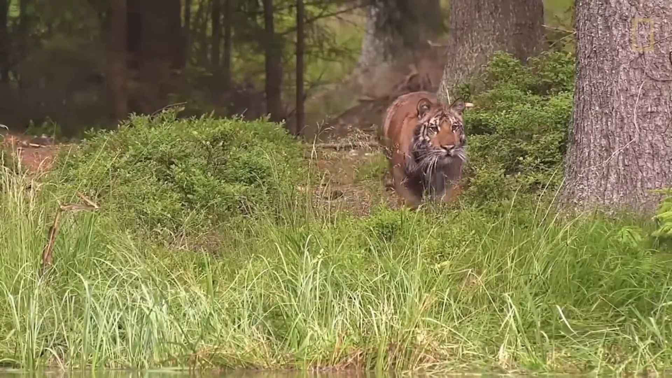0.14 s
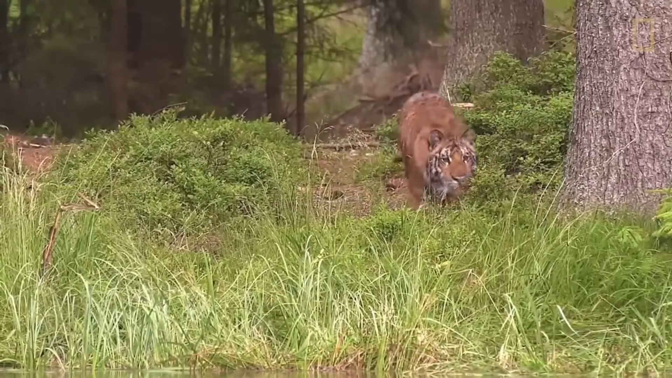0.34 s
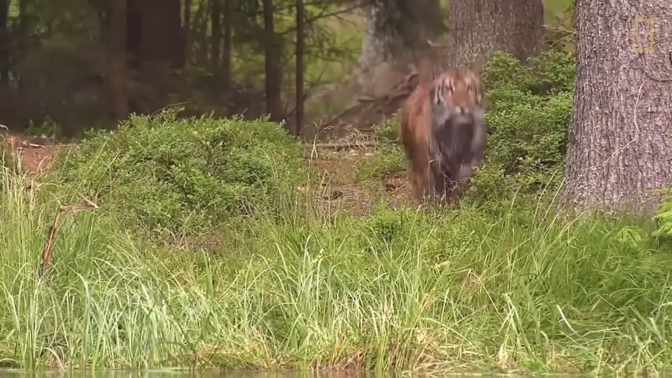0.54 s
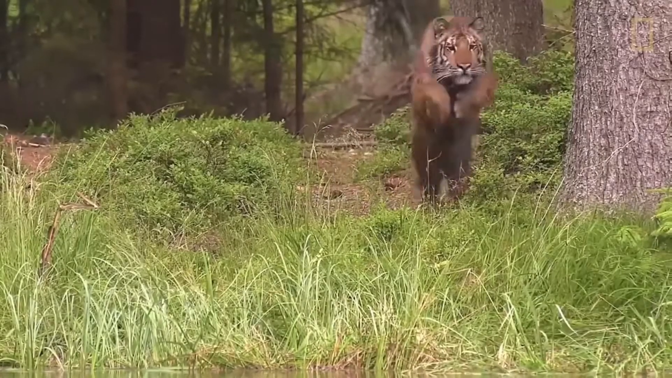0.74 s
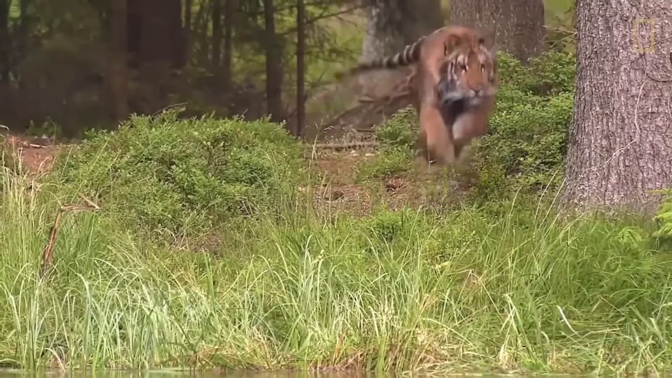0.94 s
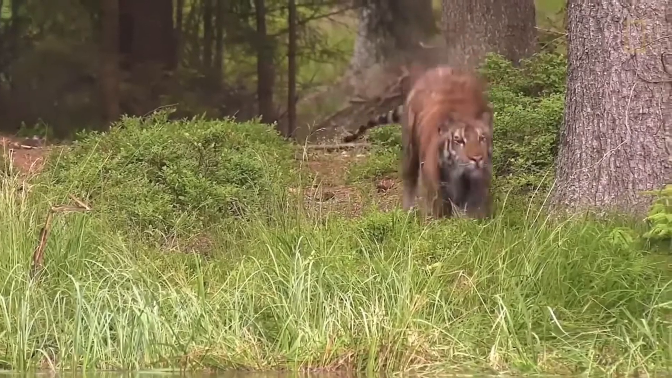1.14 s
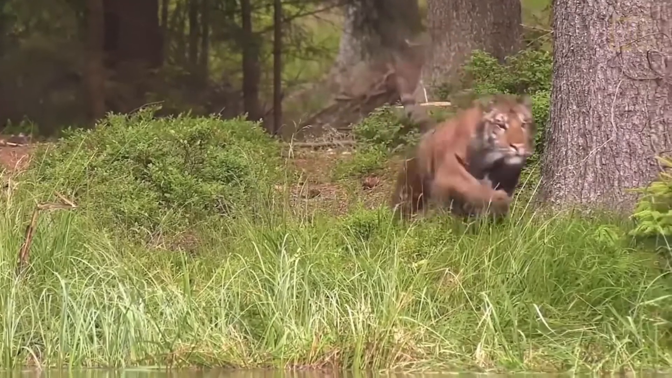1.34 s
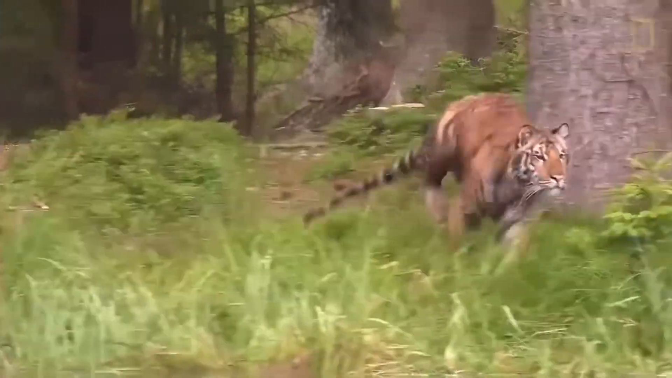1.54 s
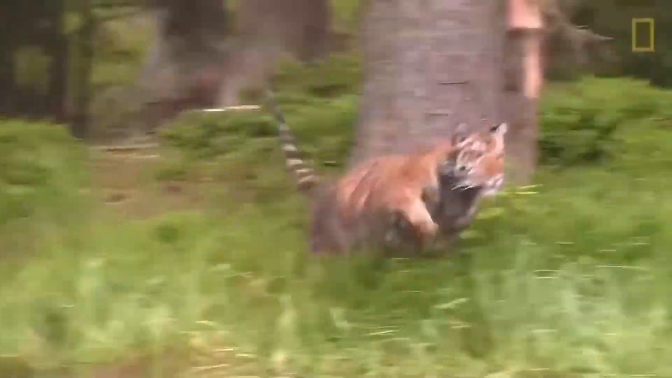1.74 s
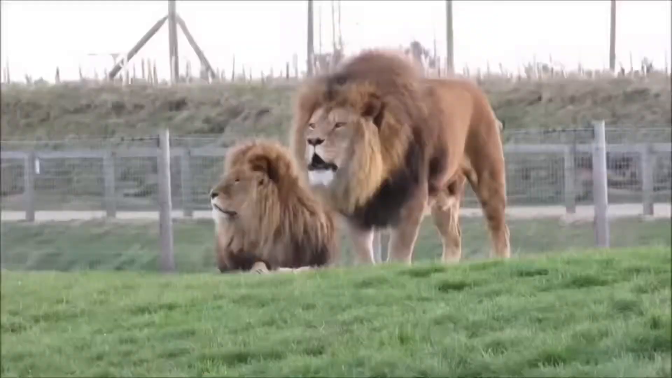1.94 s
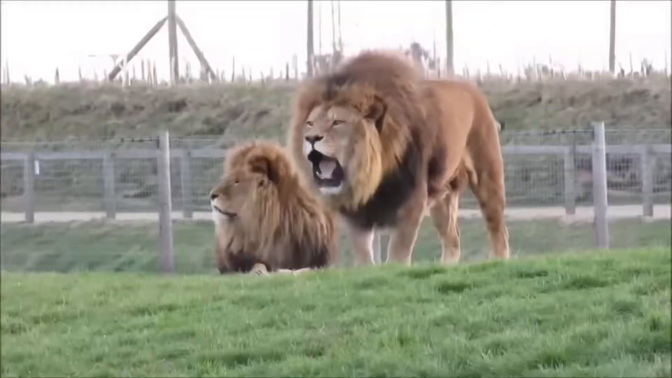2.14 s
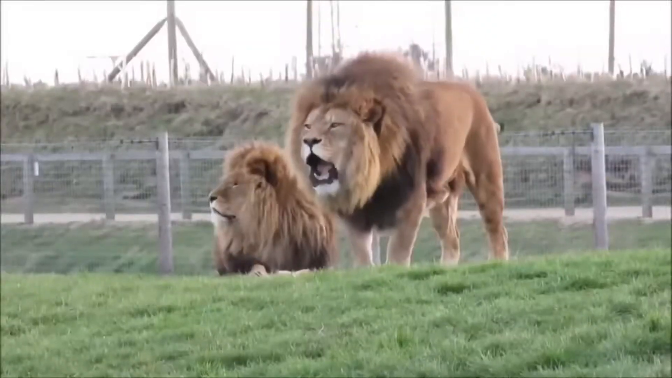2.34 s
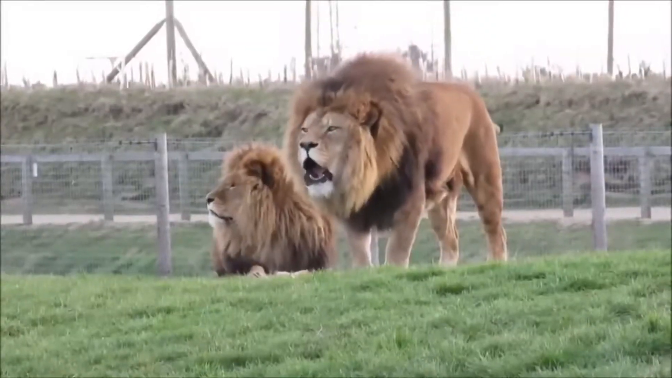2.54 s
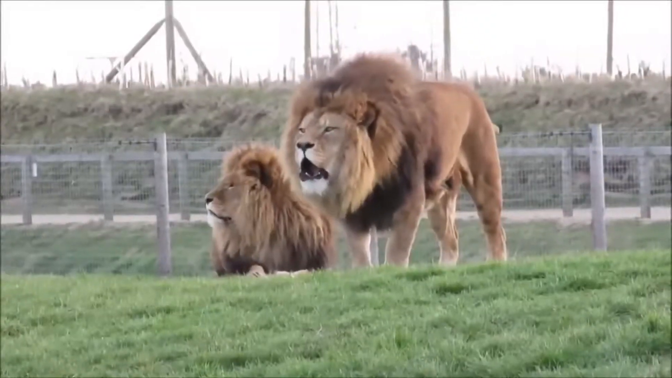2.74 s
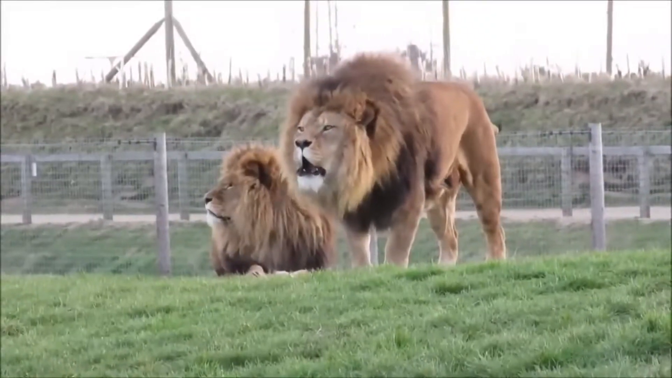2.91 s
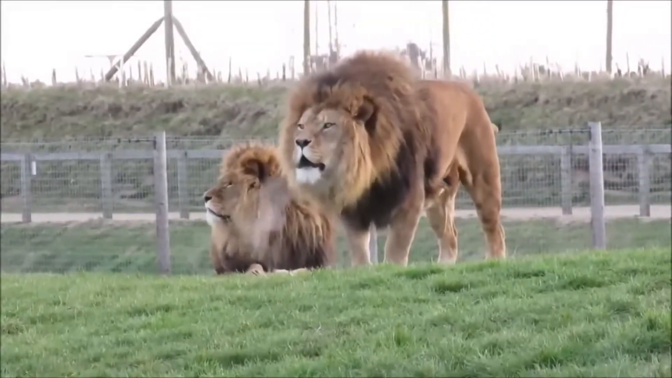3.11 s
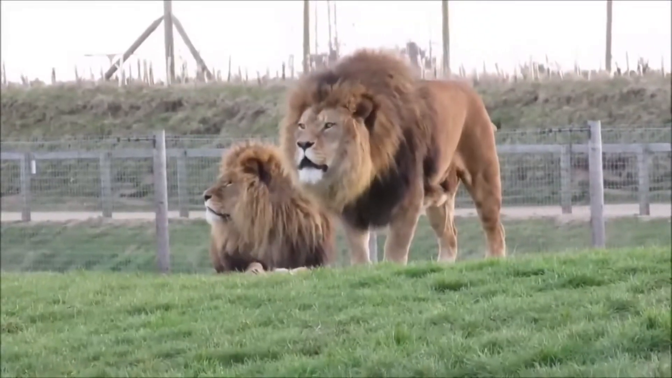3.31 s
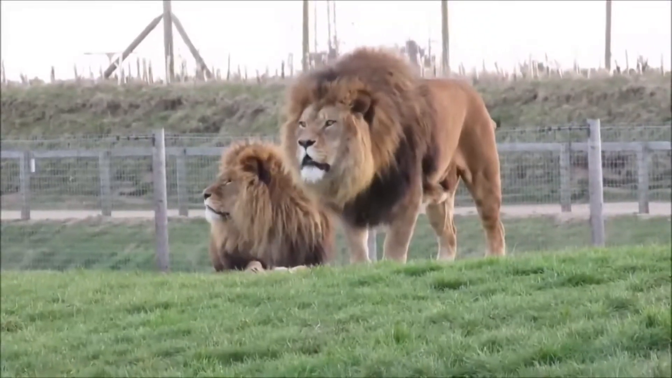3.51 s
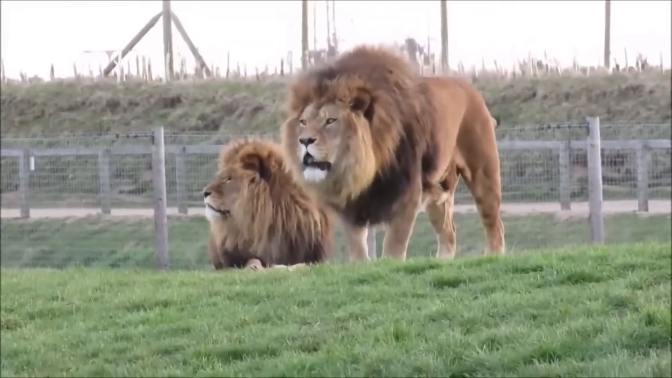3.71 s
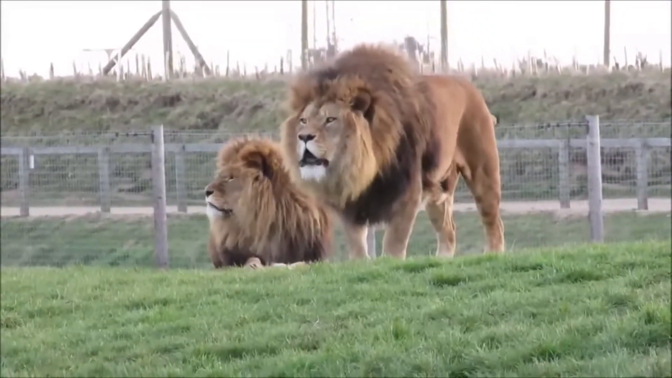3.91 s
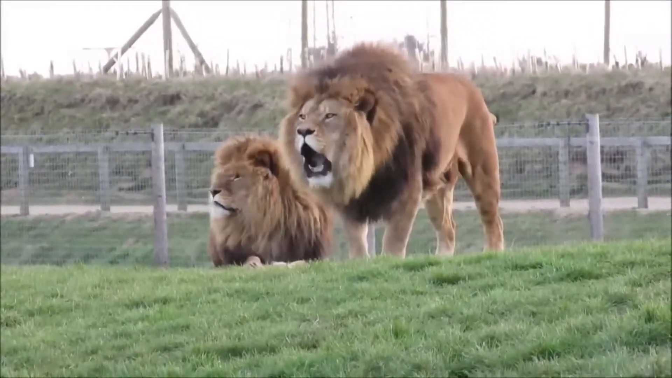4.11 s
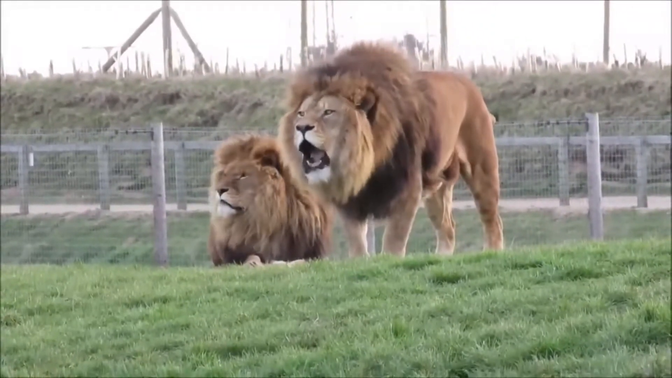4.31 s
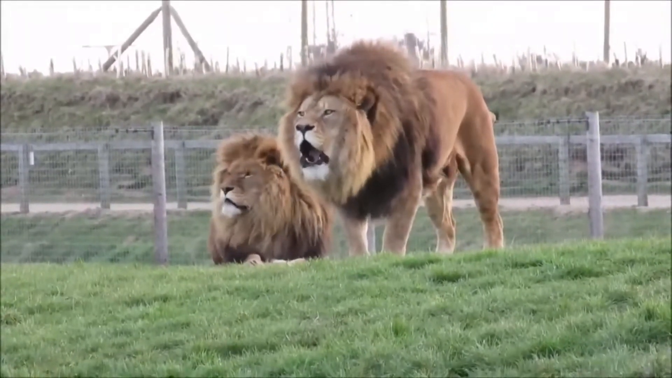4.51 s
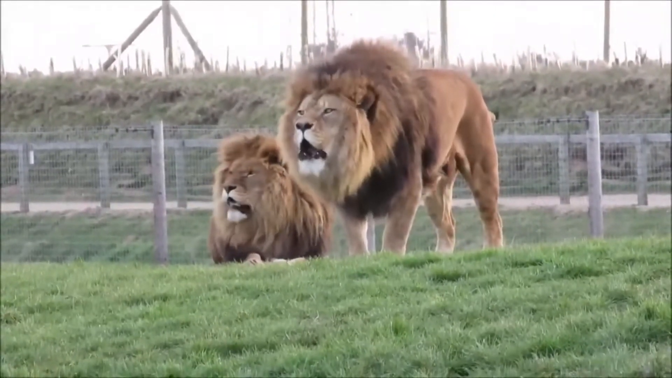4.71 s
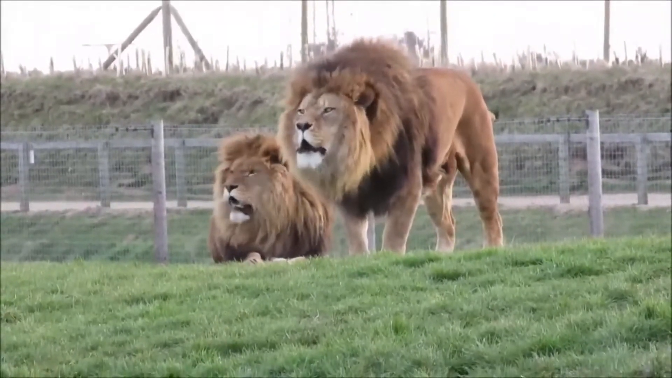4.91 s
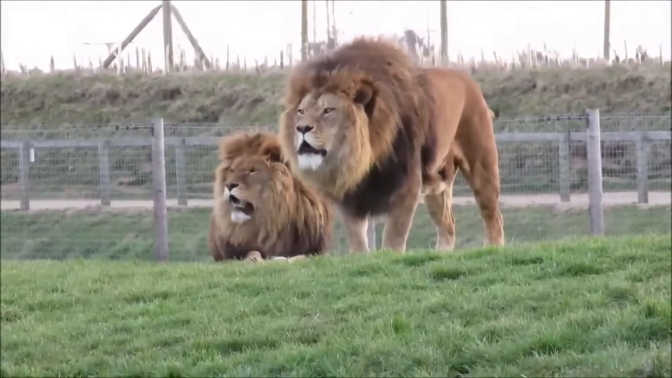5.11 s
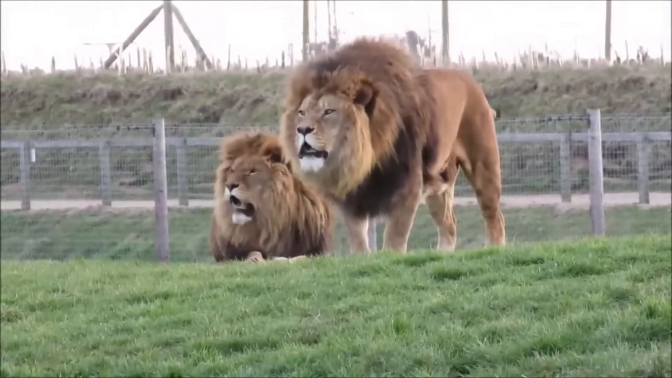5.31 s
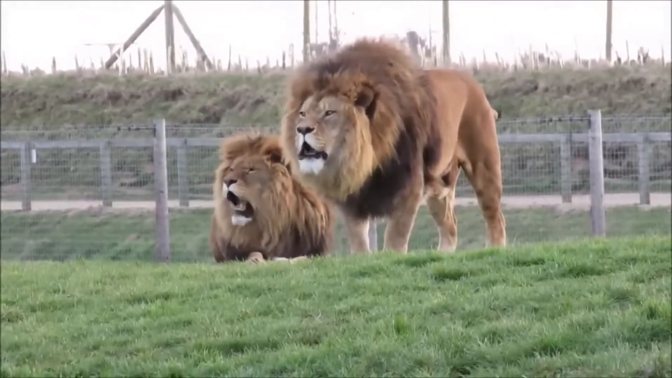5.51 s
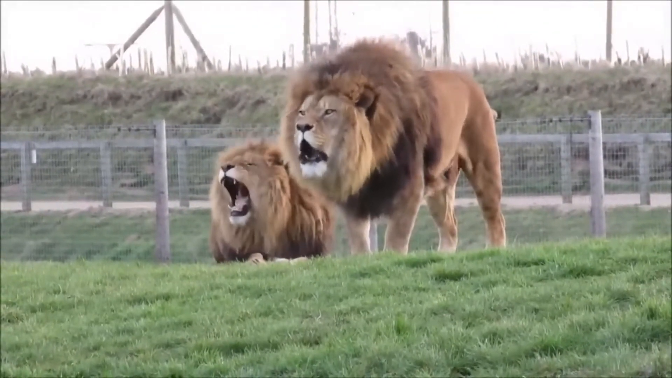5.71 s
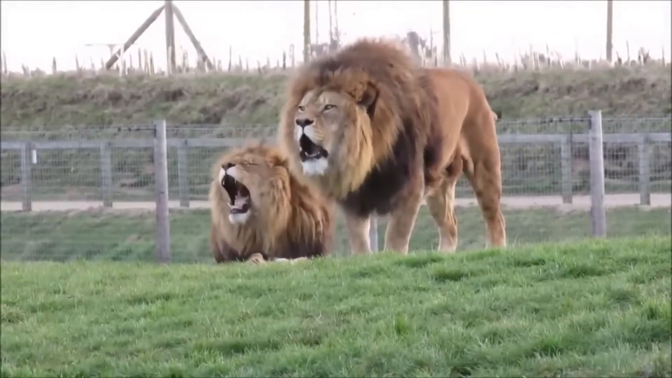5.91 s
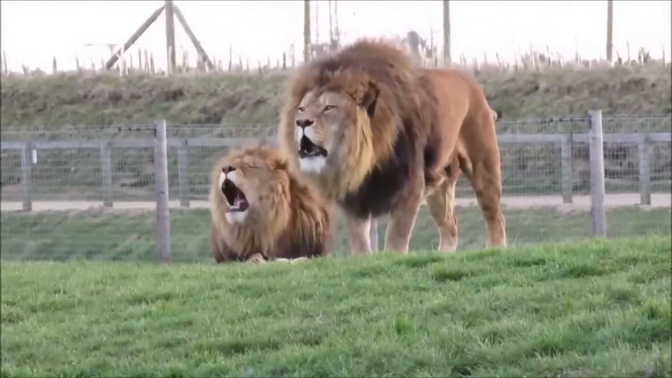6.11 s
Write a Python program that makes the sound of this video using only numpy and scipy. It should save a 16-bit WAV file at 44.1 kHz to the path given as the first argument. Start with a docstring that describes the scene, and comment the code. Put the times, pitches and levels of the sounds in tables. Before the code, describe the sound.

A lion roars four times in an open grassy enclosure. Each roar swells from a moan into a rough, chesty bellow and sinks to a grunt. A long, higher, hoarse groan follows the second roar, and the fourth is cut off as it starts. A far bird whistles faintly after the first, over a soft outdoor hush. Wind builds in the second half, rumbling and thumping on the microphone.

```python
"""A lion's moan swells, breaks up, settles into a chesty bellow and sinks to a grunt: one roar.
It roars four times in a grassy enclosure, with a long hoarse groan after the second; the last is cut off.
Its breath flaps the vocal folds in its throat; the throat booms and the open mouth rasps and hisses.
A freshening breeze buffets each side of the microphone; a far bird whistles over a soft outdoor hush."""
import sys
import numpy as np
from scipy import signal
from scipy.fft import rfft, irfft, next_fast_len
from scipy.io import wavfile
from scipy.ndimage import uniform_filter1d

SR = 44100
rng = np.random.default_rng(int(sys.argv[2]) if len(sys.argv) > 2 else 0)


def dump(signal):
    """Clip the signal to [-1, 1] and save it as 16-bit WAV at the path in sys.argv[1]."""
    limited = np.clip(np.atleast_2d(signal).T, -1, 1)
    pcm = np.round(limited * 32767).astype(np.int16)
    wavfile.write(sys.argv[1], SR, pcm)


N = 271215
TIME = np.arange(N) / SR

# The stages of a roar, from first moan to silence. A resonance is a pitch that a hollow space boosts.
# (uneven pulsing [0-1], low throat resonance [Hz], mouth resonance [Hz], upper throat [dB], nose [Hz])
ROAR_STAGES = [(0, 370, 860, 14, 3800), (0, 340, 1600, -0.5, 2700), (0.03, 315, 1400, -7, 2300),
               (0.38, 306, 1500, -4, 5700), (0.64, 255, 1480, 7.5, 3400), (0.34, 430, 1700, 10, 3150),
               (0.08, 400, 1170, -4, 3400), (0.3, 380, 1100, -4, 3700), (0.98, 250, 1200, -10.5, 3600),
               (1, 670, 2700, 1.5, 4900)]
# One list a roar, one row a stage: (time [s], pitch [Hz], roughness [0-1], mouth brightness [dB])
ROAR_COURSES = [
    [(0, 129.5, 0.11, 12), (.09, 150.5, 0.17, -5.5), (.31, 140.6, 0.31, -11), (.41, 169.7, 1.03, -10),
     (.54, 182.7, 0.5, -5.5), (.71, 195.2, 0.18, 1), (.81, 200.2, 0.58, 9.5), (.885, 152.8, 0.45, 10),
     (.95, 132.2, 0.43, 5.5), (1.1, 116.3, 1, -4)],
    [(2.21, 137, 0.74, -20), (2.31, 145.5, 0, 2.5), (2.41, 164.1, 0.83, 5.5), (2.56, 166.3, 0.51, -3.5),
     (2.73, 179.1, 0.84, -3.5), (2.88, 198.3, 0.22, -11.5), (3.07, 201.4, 0.59, -0.5),
     (3.17, 152.7, 0.52, -3.5), (3.27, 138.6, 0.63, -16), (3.38, 127, 0.83, 4)],
    [(4.28, 135, 0.45, 2), (4.325, 142.9, 0.12, 8.5), (4.375, 152, 0.63, -0.5), (4.45, 173.1, 0.6, 3),
     (4.6, 178.7, 0.36, 18), (4.79, 195.2, 0.4, -5), (4.95, 191.8, 0.67, -8.5), (5.055, 150.6, 0.52, 4),
     (5.1, 142.7, 0.53, -5.5), (5.22, 138.6, 0.16, -4)],
    [(5.92, 166, 0.4, -12), (5.96, 172.5, 0.53, 3), (5.99, 178, 0.53, -7), (6.02, 178.9, 0.65, 1),
     (6.2, 179.6, 0.4, 7)],
]
# Loudness, one list a roar: (time [s], chest [dB], throat [dB], rasp [dB], hiss [dB])
ROAR_LEVELS = [
    [(0.0, -44, -41, -55, -66.5), (0.014, -46.5, -35, -56, -63), (0.082, -53, -24, -41, -64),
     (0.128, -40.5, -23, -53.5, -68.5), (0.18, -49, -25.5, -50.5, -60), (0.306, -44.5, -18.5, -44, -62),
     (0.584, -31.5, -23, -42.5, -55.5), (0.682, -18, -27, -40, -50), (0.734, -19, -33.5, -45.5, -53),
     (0.748, -32, -30.5, -42.5, -54), (0.8, -13.5, -20, -39, -51), (0.82, -27.5, -26, -42, -50),
     (0.888, -21.5, -26, -38.5, -53), (0.926, -29, -37, -49, -52.5), (0.992, -42, -41.5, -52, -67),
     (1.06, -44.5, -61, -78, -81)],
    [(2.21, -51.5, -49, -69, -84.5), (2.242, -49.5, -39.5, -62.5, -81.5), (2.29, -47, -28.5, -46.5, -62.5),
     (2.394, -42.5, -20, -41.5, -66.5), (2.622, -45, -21, -45, -63.5), (2.764, -34.5, -25.5, -42, -53),
     (2.834, -23.5, -25, -44.5, -54), (2.85, -18.5, -30, -42, -46.5), (2.91, -16.5, -32.5, -43, -51.5),
     (2.946, -27.5, -31, -45.5, -52.5), (3.008, -21, -25.5, -39.5, -54.5), (3.108, -29, -24, -43, -54),
     (3.136, -23.5, -25.5, -40, -52), (3.16, -21, -26.5, -34.5, -56), (3.198, -20, -28.5, -43, -54.5),
     (3.3, -38.5, -39.5, -46, -63), (3.37, -50.5, -45, -54, -78)],
    [(4.29, -36, -52, -45, -77.5), (4.306, -34.5, -31.5, -52.5, -73), (4.362, -47, -23, -43, -63.5),
     (4.616, -36, -22, -38, -54.5), (4.768, -20.5, -30.5, -45, -53), (4.812, -17, -32, -40, -56),
     (4.882, -24, -26.5, -42.5, -53.5), (4.936, -23.5, -22, -37, -50), (4.964, -31, -22.5, -47, -49),
     (4.982, -25, -28, -35.5, -47), (5.022, -22.5, -24.5, -40, -48.5), (5.068, -20, -28, -35, -50),
     (5.088, -41, -36, -50, -52), (5.116, -28, -42, -49, -59), (5.138, -46, -49, -50.5, -52.5),
     (5.2, -37, -57, -70, -79)],
    [(5.93, -39, -52, -67, -95), (5.942, -46, -52, -55, -80), (5.948, -38, -33, -54, -80),
     (5.96, -40, -31, -44, -59), (5.974, -48, -33.5, -49, -63), (6.002, -22.5, -22.5, -37, -61),
     (6.01, -34, -27, -36, -54), (6.02, -44, -24.5, -38, -50), (6.04, -28, -29.5, -42.5, -55),
     (6.07, -33, -29.5, -42, -59), (6.095, -39, -31.5, -53, -52.5), (6.118, -30, -27, -36.5, -58),
     (6.14, -37, -29, -40, -58)],
]
# How each roar differs: (low throat shift [Hz], mouth shift [Hz], second throat resonance [dB],
# mouth resonance [dB], snarl [gain], treble let past the lips [dB], echo [dB])
ROAR_TRAITS = [(-13, 18.5, -11, 7, 1.3, 0.5, -44.5), (7.5, -200, -7.5, -6, 0.087, -8, -12.5),
               (10, -27.5, -12.5, 16, 1.4, 5.5, -35), (84, -165, -4.5, 13.5, 5.1, -2, -35)]
# The folds catch and the chest tone dips; a negative dip lifts it: (time [s], dip [dB])
CATCHES = [(.75, -5), (.83, 14), (2.95, 16.5), (3.09, 8.5), (4.866, 11), (4.966, 8)]
# The folds clap shut and the roar rattles: (start [s], end [s], share of the rasp [0-1])
RATTLES = [(.45, 0.723, 0.6), (2.689, 2.879, 0.21), (4.409, 4.767, 0.71), (5.979, 6.247, 0.2)]
# A narrow mouth resonance arches over the first moan: (time [s], frequency [Hz], level [dB])
OVERTONE = [(0, 1520, 17), (.06, 1700, 22), (.12, 1960, 32), (.18, 1840, 11), (.32, 1576, 9.5),
            (.45, 1616, -27)]
# Tone colours of the throat, the mouth's rasp and the hiss: (frequency [Hz], level [dB])
THROAT_COLOUR = [(150, -45), (215, -14), (260, 0), (450, -1), (600, -2), (690, -3), (770, -17), (950, -21),
                 (1150, -40)]
RASP_COLOUR = [(650, -26), (850, -1), (1100, 4), (1500, -1.5), (1850, -3), (2350, -6.5), (2550, -19.5),
               (2900, -21)]
HISS_COLOUR = [(2650, 0), (2900, -3), (3150, -3.5), (4000, -4.5), (4800, -10), (5500, -14), (6300, -19),
               (7500, -18.5), (10000, -17.5), (12000, -23), (14000, -32)]


def roar(course, levels, traits):
    """The long throat booms below 750 Hz; the open mouth adds a rasp and a hiss."""
    first_shift, mouth_shift, second_db, mouth_db, snarl, lips_db = traits
    t = np.arange(max(course[0][0], 0), course[-1][0], 1 / SR)
    age = t - t[0]
    rows = [(*point, *stage) for point, stage in zip(course, ROAR_STAGES)]
    hz, rough, bright_db, doubling, first_hz, mouth_hz, upper_db, nose_hz = curves(rows, t)
    chest_db, throat_db, rasp_db, hiss_db = curves(levels, t)
    overtone_hz, overtone_db = curves(OVERTONE, t)
    push_db = 0.78 * wander(len(t), rate_hz=29)  # the lungs push unevenly
    chest_db -= sum(dip * bump(t, s, width=0.013) for s, dip in CATCHES)
    rattle = sum(share * plateau(t, on, off, rise_s=0.029, fall_s=0.029) for on, off, share in RATTLES)
    rough = np.clip(rough, 0, 1) * (1 - rattle / 2)  # rattling folds keep steadier time
    tone, buzz, puffs, claps = folds(hz, rough, doubling, jitter=.04, slap_db=1.0)

    chest = tone * amp(5.9 * rough * wander(len(t), 32))
    chest += rough * 0.13 * unit(colour(puffs, [(110, -26), (170, 21), (240, -3.5)]))

    second_hz = 590 + 0.99 * (hz - 140)  # the voice box and jaw tighten together
    opening = amp(upper_db) * (1 - np.exp(-age / 0.18))  # the jaw takes a moment to drop
    upper = 0.34 * buzz + amp(second_db) * resonate(buzz, second_hz, 93)
    throat = colour(resonate(buzz, first_hz + first_shift, 51) + opening * upper, THROAT_COLOUR)

    # the mouth opens, then the voice box is drawn down and the throat lengthens
    tuning = np.interp(age, [0, .2, .45, 1], [.98, 1.04, 1.02, .9]) * (1 + .014 * wander(len(t), 6))
    breath = cavities(buzz + (0.18 + 3 * rough) * puffs, tuning, ring_s=.003)
    breath *= amp(1.5 * rough * wander(len(t), 32))
    clatter = cavities(claps, tuning, ring_s=0.00115)
    airy = np.sqrt(1 - rattle) * unit(breath) + np.sqrt(rattle) * unit(clatter)

    jaw = 1 + .03 * wander(len(t), 7)  # the mouth resonance glides as the jaw works
    mouth = amp(mouth_db + bright_db) * resonate(airy, (mouth_hz + mouth_shift) * jaw, 80)
    overtone = amp(overtone_db) * resonate(airy, overtone_hz, 70)
    teeth = snarl * resonate(airy, hz=2147, width_hz=81)
    lips = [(f, db + lips_db * np.interp(f, [1500, 2200], [0, 1])) for f, db in RASP_COLOUR]
    rasp = colour(airy + overtone + mouth + teeth, lips)
    hiss = colour(airy + amp(1.5) * resonate(airy, nose_hz, 220), HISS_COLOUR)
    voice = (amp(chest_db) * steady(chest) + amp(throat_db) * steady(throat, size=900)
             + amp(rasp_db) * steady(rasp) + amp(hiss_db) * steady(hiss))
    return t[0], voice * amp(push_db) * signal.windows.tukey(len(t), .04)


# Soft flesh shuts without a click: (frequency [Hz], level [dB])
CLAP_COLOUR = [(60, 3), (2200, -4), (3000, -11.5)]


def folds(hz, rough, doubling, jitter, slap_db):
    """Flapping vocal folds make a plain tone, a buzz, puffs of air and a clap every second flap."""
    count = len(hz)
    turns = np.cumsum(hz * (1 + jitter * (0.14 + rough) * wander(count, 90))) / SR
    # thick folds close in a rolling wave, which spreads each pulse out
    lag = .12 * np.arange(48) ** 2 + .9 * rng.standard_normal(48)
    # doubling: strong and weak pulses take turns, adding tones halfway between the usual overtones
    pulses = sum((3.6 * doubling if k % 2 else 1) * np.cos(np.pi * k * turns - lag[k])
                 for k in range(2, len(lag)))
    weak = np.floor(turns) % 2
    airflow = (0.34 + np.exp(-(turns % 1) / 0.5)) * (1 - 0.5 * doubling * weak)
    puffs = unit(airflow * amp(slap_db * wander(count, 33)) * rng.standard_normal(count))
    buzz = (1 - rough) * unit(pulses) * amp(6 * rough * wander(count, 70)) + 1.4 * rough * puffs
    pairs = turns / 2 - .15
    shut = np.diff(np.floor(pairs), prepend=np.floor(pairs[0]))
    clap_air = .16 + np.exp(-(pairs % 1) / 0.34)  # a steady leak, plus a puff after each clap
    claps = unit(colour(shut, CLAP_COLOUR)) + unit(clap_air * rng.standard_normal(count))
    claps *= amp(1.8 * wander(count, 60))
    return np.sqrt(2) * np.cos(2 * np.pi * turns), buzz, puffs, claps


# High resonances of the mouth and nose: (frequency [Hz], width [Hz], level [dB])
CAVITIES = [(1740, 160, -6.5), (2199, 23, 5), (3290, 110, 3), (3700, 260, -7), (4440, 280, 2),
            (4820, 110, 3), (7660, 200, -2.5)]


def cavities(x, tuning, ring_s, count=28):
    """Echoes off the quivering throat walls smear each pulse; tuning above 1 raises the resonances."""
    at, smeared = np.arange(len(x)), np.zeros(len(x))
    for distance, sign, speed, phase in rng.random((count, 4)):
        delay = 3 * ring_s * distance
        quiver = 1 + .035 * np.sin(2 * np.pi * ((2 + 6 * speed) * at / SR + phase))
        echo = np.interp(at - delay / tuning * quiver * SR, at, x)
        smeared += np.sign(sign - .5) * np.exp(-delay / ring_s) * echo
    x = 0.54 * unit(x) + unit(smeared)
    return 1.4 * x + sum(amp(db) * resonate(x, hz * tuning, width) for hz, width, db in CAVITIES)


# The groan's tune: (time [s], pitch [Hz])
GROAN_PITCH = [(3.22, 263.5), (3.328, 249), (3.518, 281.2), (3.576, 274), (3.786, 285), (3.934, 268.7),
               (3.99, 231.4), (4.04, 205.4), (4.1, 189.2), (4.15, 248.2), (4.28, 195)]
# Its loudness: (time [s], throat [dB], rasp [dB])
GROAN_LEVELS = [(3.22, -29.5, -42), (3.28, -34, -46.5), (3.334, -33, -44.5), (3.38, -35.5, -46),
                (3.518, -32.5, -43.5), (3.574, -40.5, -44.5), (3.59, -30.5, -39.5), (3.644, -28.5, -46),
                (3.69, -32.5, -38), (3.71, -33, -44), (3.85, -22.5, -40.5), (3.866, -36, -40.5),
                (3.898, -25, -37.5), (4.05, -35.5, -49), (4.074, -36, -46), (4.106, -46, -49),
                (4.164, -28.5, -36), (4.196, -42, -60.5), (4.27, -46.5, -56)]
# Tone colours of its throat, rasp and hiss: (frequency [Hz], level [dB])
GROAN_THROAT = [(300, -38.5), (400, -10), (500, -0.5), (590, 0), (700, -4.5), (850, -10), (1100, -12.5)]
GROAN_RASP = [(950, -14), (1100, -2), (1300, 12), (1450, 8.5), (1600, 1.5), (1760, 14.5), (2050, 1),
              (2280, -3.5), (2600, 4.5), (2720, -2.5), (2850, -19)]
GROAN_HISS = [(2900, -8.5), (3250, 6.5), (3700, -13.5), (4500, -19), (5500, -14.5), (6800, -24.5),
              (8000, -54.5), (12000, -68.5)]


def groan():
    """A higher, strained voice: the throat rings at twice the pitch of the folds."""
    t = np.arange(3.22, 4.28, 1 / SR)
    hz = curves(GROAN_PITCH, t)[0]
    throat_db, rasp_db = curves(GROAN_LEVELS, t)
    clearing = bump(t, at=3.88, width=0.14)  # the voice clears at its height
    rough = .55 - .28 * clearing
    boom_db = 27.5 * bump(hz, at=189, width=45)  # the chest booms as the pitch sinks to its resonance
    chest_db = throat_db - 13.5 + boom_db * np.interp(t, [4.09, 4.13], [1, 0])  # no boom in the last gasp
    hiss_db = rasp_db - 35.5 + 24.5 * (t - t[0])  # more hiss as the air runs out
    tone, buzz, puffs, _ = folds(hz, rough, doubling=0.31, jitter=0.045, slap_db=6.5)
    chest = tone + rough * 0.37 * unit(colour(puffs, [(170, -9), (235, 2), (320, -8)]))
    throat = colour(0.28 * buzz + 0.13 * puffs + resonate(buzz, 2 * hz, 68), GROAN_THROAT)
    throb_hz = 31 * (1 + .35 * wander(len(t), 15))  # slack flesh flaps slowly
    throb = np.sin(2 * np.pi * np.cumsum(throb_hz) / SR)
    flutter = amp(wander(len(t), 40) + (.75 + clearing / 4) * throb)  # the folds catch and let go
    tuning = (hz / 280) ** .3 * (1 + .015 * wander(len(t), 8))
    airy = cavities(buzz + 0.78 * puffs, tuning, ring_s=.0034) * flutter
    mouth = amp(-2) * clearing * resonate(airy, 1360 * tuning, 350)  # it opens as the voice clears
    rasp = colour(airy + mouth, GROAN_RASP)
    voice = (amp(chest_db) * steady(chest) + amp(throat_db) * steady(throat * np.sqrt(flutter))
             + amp(rasp_db) * steady(rasp) + amp(hiss_db) * steady(colour(airy, GROAN_HISS)))
    return t[0], voice * signal.windows.tukey(len(t), .12)


# Single hard slaps of the folds: (time [s], level [dB])
SLAPS = [(.074, -25.5), (.752, -29), (.841, -26.5), (4.414, -22.5), (4.437, -22.5), (4.481, -22.5),
         (4.514, -27.5), (4.977, -23)]
# The tones that ring after a slap: (frequency [Hz], level against the slap [dB], time to fade 60 dB [s])
SLAP_TONES = [(665, 6.5, 0.028), (1333, -10, 0.063), (1550, -7.5, 0.051), (1694, -16.5, 0.03),
              (2300, -19, 0.054), (3840, -24.5, 0.03)]


def slaps():
    """Where the voice breaks, single slaps of the folds set the throat and mouth ringing."""
    out, t = np.zeros(N), TIME[:SR // 12]
    soft_start = 1 - bump(t, 0, width=0.0013)
    for s, slap_db in SLAPS:
        for hz, db, fade_s in SLAP_TONES:
            tone = np.sin(2 * np.pi * (hz * rng.uniform(0.99, 1.02) * t + rng.random()))
            add(out, s, amp(slap_db + db - 60 * t / fade_s) * tone * soft_start)
    return out


# Wet crackles in the mouth: (time [s], half length [s], frequency [Hz], level [dB])
SPITS = [(0.436, .008, 5000, -59.5), (.458, 0.0027, 5260, -54), (0.467, .008, 5460, -63),
         (0.514, 0.0045, 5100, -56.5), (5.243, 0.0027, 6000, -68), (5.267, 0.0037, 4060, -61.5),
         (5.982, .004, 7260, -61), (6.022, .003, 7100, -58), (6.066, 0.0073, 3370, -48),
         (6.119, 0.019, 7400, -64)]


def spits():
    """Air tears through saliva in short, fizzy bursts."""
    out, t = np.zeros(N), np.arange(-.03, .03, 1 / SR)
    for s, half, hz, db in SPITS:
        fizz = resonate(rng.standard_normal(len(t)), hz, width_hz=1000)
        fizz = resonate(fizz, hz, width_hz=2000)
        add(out, s + t[0], amp(db) * unit(fizz) * bump(t, 0, half))
    return out


# Gusts on the microphone: (time [s], half length [s], level [dB], share of flutter [0-1, capped at 1])
GUSTS = [(0.449, 0.019, -32.5, 0.1), (1.003, 0.39, -43, 0.6), (1.244, 0.02, -42, 0),
         (1.548, 0.023, -43.5, 0.5), (3.741, 0.31, -31.5, 0.07), (4.51, 0.24, -30.5, 1.2),
         (5.01, 0.16, -33, 0.95), (5.512, 0.25, -34, 1.11), (5.9, 0.14, -34.5, 1.23)]
# Tone colours of the wind's low rumble and higher flutter: (frequency [Hz], level [dB])
RUMBLE_COLOUR = [(20, -30), (50, -10), (90, 1), (140, -4.5), (220, 1), (400, -28.5), (600, -47)]
FLUTTER_COLOUR = [(30, -31), (80, -11.5), (150, 5), (300, -0.5), (440, -1.5), (520, -25.5), (800, -42)]


def wind():
    """A breeze rumbles on the microphone, rises and drops; swirls of air hit each side differently."""
    fresh = plateau(TIME, on=2.9, off=5.904, rise_s=1, fall_s=0.1)
    breeze_db = -55 + 15 * fresh
    breeze = air(RUMBLE_COLOUR, spread=0.11) * amp(breeze_db + 4.2 * wander(N, 6.3))
    rumble = fresh * amp(breeze_db - 7.5)  # small swirls between the gusts
    flutter = np.zeros(N)
    for s, half, db, share in GUSTS:
        gust, share = amp(db) * bump(TIME, s, half), min(share, 1)
        rumble += np.sqrt(1 - share) * gust
        flutter += np.sqrt(share) * gust
    gusts = rumble * air(RUMBLE_COLOUR, spread=1.0) + flutter * air(FLUTTER_COLOUR, spread=0.45)
    gusts *= amp(2.5 * wander(N, 16))
    return breeze + gusts + colour(thumps(), FLUTTER_COLOUR)


# Single knocks of wind: (time [s], level before filtering [dB])
THUMPS = [(1.241, -31), (5.125, -25.5), (5.331, -15.5), (5.398, -16.5), (5.462, -16), (5.543, -13.5),
          (5.58, -19.5), (5.619, -25.5), (5.737, -16.5), (5.791, -14.5), (5.852, -21), (5.888, -15)]


def thumps():
    """The strongest swirls hit the microphone as low thumps, out of step on its two sides."""
    out, t = np.zeros((2, N)), np.arange(-.02, .02, 1 / SR)
    for s, db in THUMPS:
        phase = 2 * np.pi * (rng.uniform(160, 430) * t + rng.random())
        for side in out:
            tone = np.sin(phase + 1.1 * rng.standard_normal())
            add(side, s + t[0], amp(db) * tone * bump(t, 0, width=0.0021))
    return out


# One list a whistle: (time [s], pitch [Hz], level [dB])
WHISTLES = [
    [(1.16, 2400, -85), (1.21, 2730, -59), (1.25, 2150, -67)],
    [(1.18, 1760, -66), (1.3, 1880, -60), (1.38, 1800, -62)],
    [(1.34, 2750, -72), (1.38, 2400, -58), (1.42, 1820, -61)],
]


def bird():
    """A far bird whistles pure, gliding tones with a slight waver."""
    out = np.zeros(N)
    for rows in WHISTLES:
        t = np.arange(rows[0][0], rows[-1][0], 1 / SR)
        hz, db = curves(rows, t)
        turns = np.cumsum(hz * (1 + 0.0073 * wander(len(t), 80))) / SR
        add(out, t[0], amp(db) * np.sin(2 * np.pi * turns) * signal.windows.tukey(len(t), .3))
    return out


# How long the echoes last: (frequency [Hz], time to fade 60 dB [s])
ECHO_FADES = [(100, 0.95), (500, 0.76), (2000, 0.42), (8000, 1)]


def echoes(x):
    """Sound bounces faintly off the bank and fences, each frequency fading at its own speed."""
    per_s, first_s = 2000, .012
    bounces = rng.standard_normal((2, SR)) * (rng.random((2, SR)) < per_s / SR) * (TIME[:SR] > first_s)
    hz, t, bands = signal.stft(bounces + 0.28 * bounces[::-1], SR, nperseg=256)
    fade = amp(-60 * t / read(ECHO_FADES, hz)[:, None])
    tail = signal.istft(bands * fade, SR, nperseg=256)[1]
    return signal.fftconvolve(x[None], tail / np.linalg.norm(tail[0]), axes=1)[:, :N]


# Tone colour of the outdoor background: (frequency [Hz], level [dB])
HUSH_COLOUR = [(25, -4.5), (60, -5.5), (200, -3.5), (400, 0), (600, -2), (900, 1), (1300, -8), (1800, -18),
               (2500, -28.5), (4000, -34.5), (6000, -40), (10000, -45.5), (12000, -55.5), (14000, -63)]


def hush():
    """A soft, low outdoor noise whose level wavers slightly."""
    noise = out_of_step(air(HUSH_COLOUR, spread=0.3), radians=-0.16)
    return amp(-47.5) * noise * amp(.5 * wander(N, 12))


def air(points, spread):
    """Filtered noise, partly different on the left and right."""
    mid, side = colour(rng.standard_normal((2, N)), points)
    return unit(np.array([mid + spread * side, mid - spread * side]))


def out_of_step(pair, radians):
    """Sound from one side reaches left and right out of step; a positive angle puts the left ahead."""
    return (signal.hilbert(pair) * np.exp(1j * radians * np.array([[1], [-1]]))).real


def colour(x, points):
    """Filters by (frequency [Hz], level [dB]) points, falling away beyond both ends."""
    size = next_fast_len(x.shape[-1] + 4096)
    hz = np.fft.rfftfreq(size, 1 / SR)
    low_cut = 1 + (.8 * points[0][0] / (hz + 1)) ** 8
    high_cut = 1 + (.8 * hz / points[-1][0]) ** 8
    gain = amp(read(points, hz)) / np.sqrt(low_cut * high_cut)
    return irfft(rfft(x, size) * gain, size)[..., :x.shape[-1]]


def resonate(x, hz, width_hz):
    """Keeps the sound near hz, which may glide, as a ringing hollow does."""
    turn = np.exp(2j * np.pi * np.cumsum(hz * np.ones(len(x))) / SR)
    decay = np.exp(-np.pi * width_hz / SR)
    return 2 * (turn * signal.lfilter([1 - decay], [1, -decay], x / turn + 1e-18)).real


def wander(count, rate_hz):
    """A smooth random wobble of size about one, mostly slower than rate_hz."""
    hz = np.fft.rfftfreq(count, 1 / SR)
    return unit(irfft(rfft(rng.standard_normal(count)) / (1 + (hz / rate_hz) ** 4), count))


def steady(x, size=1500):
    """Evens out the loudness, so that a level curve can set it."""
    return x / np.sqrt(abs(uniform_filter1d(uniform_filter1d(x ** 2, size), size)) + 1e-20)


def unit(x):
    """Scales a sound to an average power of one."""
    return x / np.sqrt(np.mean(x ** 2) + 1e-20)


def amp(db):
    """Turns decibels into a gain."""
    return 10 ** (np.asarray(db) / 20)


def read(points, hz):
    """Looks up a table's value at any frequency."""
    f, value = np.transpose(points)
    return np.interp(np.log(hz + 1), np.log(f + 1), value)


def curves(rows, t):
    """Joins timed rows into one curve for each value column."""
    s, *columns = np.transpose(rows)
    return [np.interp(t, s, c) for c in columns]


def bump(t, at, width):
    """A smooth hump of height one."""
    return np.exp(-((t - at) / width) ** 2)


def plateau(t, on, off, rise_s, fall_s):
    """Rises smoothly towards one, then falls back."""
    return (np.tanh((t - on) / rise_s) - np.tanh((t - off) / fall_s)) / 2


def add(mix, s, sound):
    """Mixes a sound in, starting at s seconds."""
    part = mix[max(round(s * SR), 0):][:len(sound)]
    part += sound[:len(part)]


def scene():
    """Lion and bird near the middle, with their echoes, the outdoor hush and the wind."""
    roars, to_echo = slaps() + spits(), np.zeros(N)
    for course, levels, (*traits, echo_db) in zip(ROAR_COURSES, ROAR_LEVELS, ROAR_TRAITS):
        start, voice = roar(course, levels, traits)
        add(roars, start, voice)
        add(to_echo, start, amp(echo_db) * voice)
    bird_and_groan = bird()
    add(bird_and_groan, *groan())
    to_echo += amp(-6) * bird_and_groan
    direct = roars + out_of_step(np.array([bird_and_groan] * 2), radians=0.32)
    return direct + echoes(to_echo) + hush() + wind()


def record(dry):
    """Cuts the treble above 14 kHz."""
    low_pass = signal.firwin(511, 14000, window=("kaiser", 9), fs=SR)
    return signal.oaconvolve(dry, low_pass[None], "same")


dry = scene()
out = record(dry)
dump(out)
```